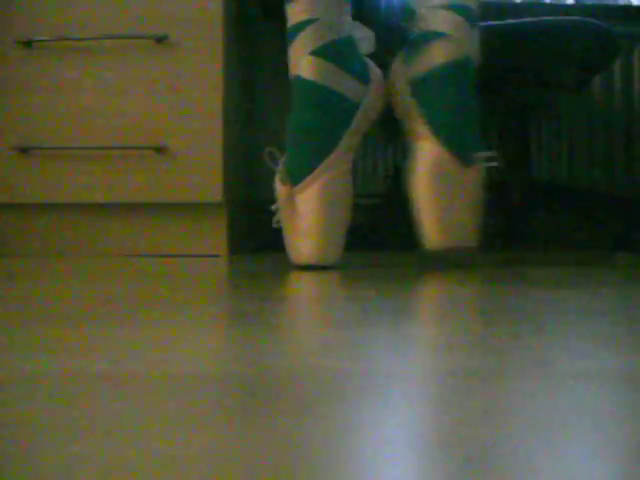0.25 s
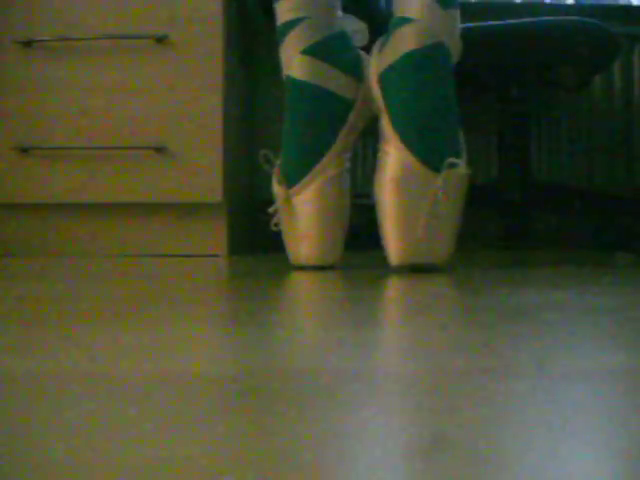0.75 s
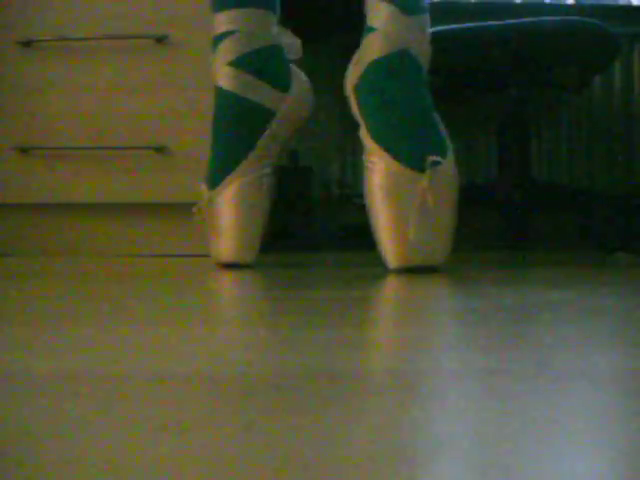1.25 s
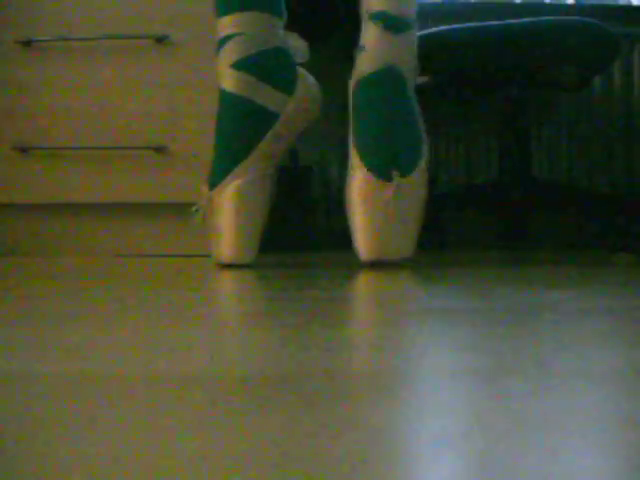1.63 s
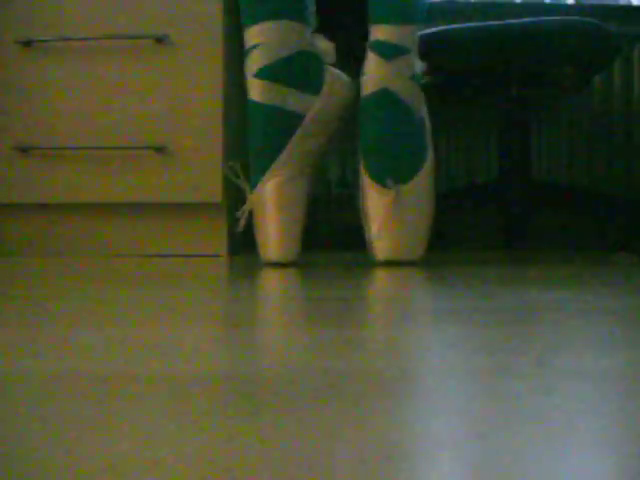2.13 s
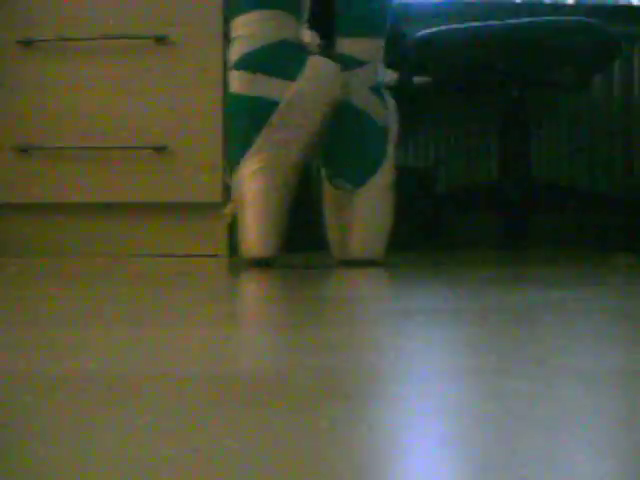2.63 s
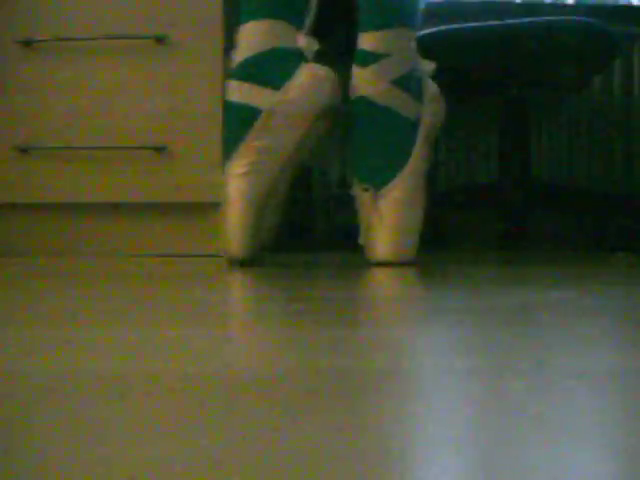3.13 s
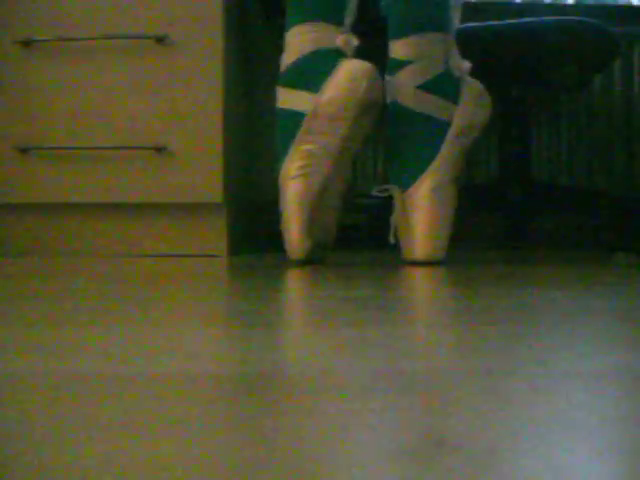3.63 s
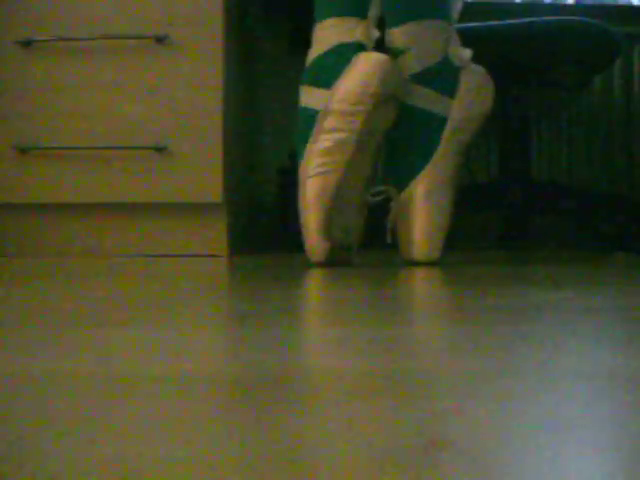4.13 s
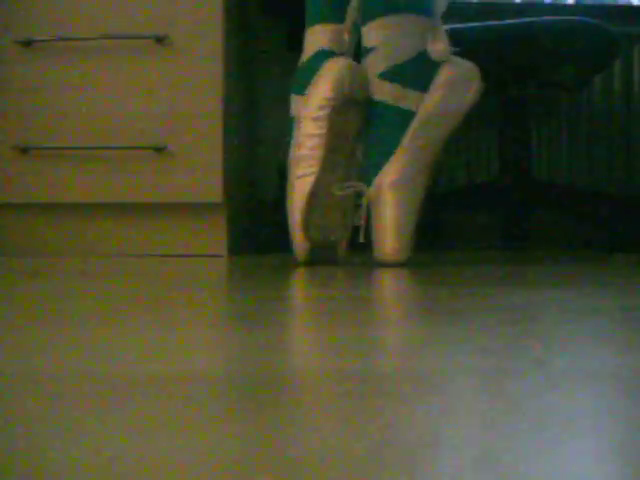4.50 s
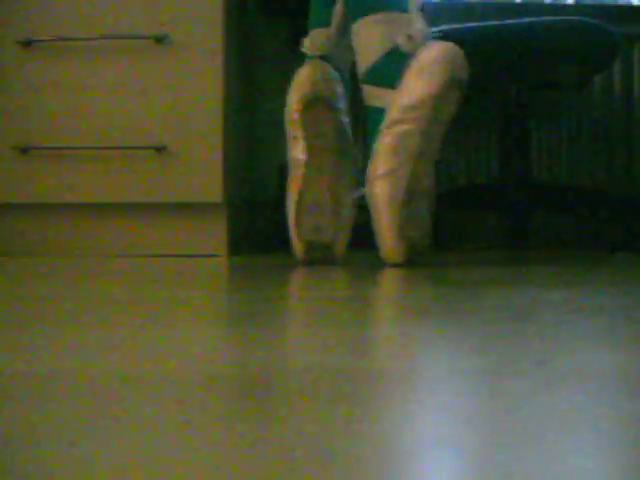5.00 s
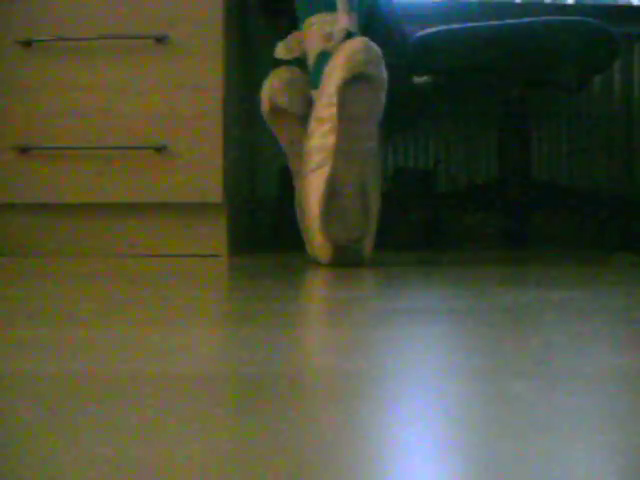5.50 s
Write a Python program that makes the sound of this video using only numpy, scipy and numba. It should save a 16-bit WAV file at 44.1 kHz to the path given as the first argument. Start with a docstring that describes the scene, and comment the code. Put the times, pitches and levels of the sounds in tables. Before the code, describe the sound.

A rough electrical buzz, pulsing about twenty-five times a second with spiky clicks over a low hum, runs from start to end with hiss, fine crackle and a very faint thin whine. A soft scuff near 0.5 s leads to a weighty, dull landing at 0.6. Stiff toe boxes then knock on the hard floor at 1.2, 1.6 and 1.9 s, with lighter taps between. Harder hollow clacks come at 2.5 and 2.7, then, after a gap, at 3.2 and 3.6. The strongest is at 4.05, followed by knocks at 4.4, 4.7 and a loud one at 4.9. A softer, thuddy step lands at 5.2; faint brushes follow to about 5.7, leaving the buzz. Each knock is a tight double contact with a low thud and short small-room ring. The close, cheap microphone sounds narrow and gritty; loud hits clip, and the background ducks then creeps back.

```python
"""Electrical buzz and hiss come first; then a dancer on pointe scuffs and knocks about on a hard floor.
Each landing sums decaying modes of toe box and floor, contact noise, a low thud and a small room's decay.
The satin tips scuff as grainy noise; the buzz repeats spikes over a hum, with hiss, ticks and a thin whine.
A cheap camera close by passes a narrow band, ducks its gain after loud sound and clips the peaks flat."""
import sys
import numpy as np
from scipy import signal
from scipy.fft import rfft, irfft, next_fast_len
from scipy.io import wavfile
from scipy.ndimage import uniform_filter1d
from numba import njit

SR = 44100
rng = np.random.default_rng(int(sys.argv[2]) if len(sys.argv) > 2 else 0)


def wrap_up_sound(samples):
    """Save the sound to the file named by the first command line argument, as 16-bit audio."""
    columns = np.atleast_2d(samples).T
    # keep every value between -1 and 1, then stretch to whole-number steps
    tamed = np.clip(columns, -1, 1)
    steps = np.round(tamed * 32767).astype(np.int16)
    wavfile.write(sys.argv[1], SR, steps)


N = 254016  # length of the scene [samples]

# Toe landings: (time [s], knock of the box [dB], thud of the weight behind it [dB])
LANDINGS = [(0.622, -8, 2.5), (1.188, -0.5, 3), (1.413, -18, -18.5), (1.624, -2.5, 0), (1.744, -13, -20),
            (1.870, 2.5, -5), (2.087, -6, -1.5), (2.194, -22.5, -24.5), (2.285, -19, 0.5), (2.51, 8, -1.5),
            (2.716, 6, -3), (3.197, 5, 0.5), (3.421, -10.5, -3.5), (3.630, 6, -3), (3.9443, -4.5, -14.5),
            (4.043, 11.5, 3.5), (4.258, -17.5, -3), (4.447, 0.5, -3), (4.711, 3.5, 3), (4.907, 11, -1.5),
            (5.18, -6.5, 3.5)]


def amp(db):
    """Level to amplitude: 20 dB is a factor of ten."""
    return 10 ** (np.asarray(db) / 20)


def unit(x):
    """Normalisation: x scaled to an rms of 1."""
    return x / np.sqrt(np.mean(x ** 2) + 1e-20)


def along(points, hz):
    """Interpolation of (frequency [Hz], value) points on a logarithmic frequency axis."""
    f, v = np.transpose(points)
    return np.interp(np.log(hz + 1), np.log(f + 1), v)


def filtered(x, response):
    """Linear filtering: the spectrum of x times a complex response of frequency."""
    m = next_fast_len(len(x) + 8192)  # zero padding leaves room for the filter's tail
    spectrum = rfft(x, m) * response(np.fft.rfftfreq(m, 1 / SR))
    return irfft(spectrum, m)[:len(x)]


def noise(spectrum, size):
    """Coloured noise: white noise shaped by a spectrum, at an rms of 1."""
    white = rng.standard_normal(size)
    return unit(filtered(white, lambda hz: amp(along(spectrum, hz))))


def add(track, s, sound):
    """Superposition: mix a sound into the track at time s [s]."""
    part = track[max(0, round(s * SR)):][:len(sound)]
    part += sound[:len(part)]


def hiss(hiss_db=-20.5, crackle_db=-28, crackle_rate=80, crackle_hz=700):
    """Random noise: a steady hiss, sparse impulses at crackle_rate per second and a faint pure tone."""
    # Colour of the hiss: (frequency [Hz], relative level [dB per Hz])
    hiss_spectrum = [(25, -17.5), (60, 3), (130, 1.5), (220, -1), (330, -2.5), (550, -3), (900, -5),
                     (1200, -10.5), (1500, -15.5), (2050, -23.5), (2550, -17.5), (3200, -24.5), (4000, -28)]
    # Thin electrical tone: (frequency [Hz], rms level [dB])
    whine_tones = [(2498, -47.5)]
    t = np.arange(N) / SR
    ticks = (rng.random(N) < crackle_rate / SR) * rng.uniform(-1, 1, N)

    def tick_band(hz):
        high_pass = 1j * hz / (160 + 1j * hz)
        return high_pass / (1 + 1j * hz / crackle_hz) ** 2

    crackle = unit(filtered(ticks, tick_band))
    whine = sum(amp(db) * np.sqrt(2) * np.sin(2 * np.pi * hz * t) for hz, db in whine_tones)
    return amp(hiss_db) * noise(hiss_spectrum, N) + amp(crackle_db) * crackle + whine


def buzz(buzz_db=0, hum_lag=0.0091, coupling_hz=69, scatter_db=1.5):
    """Periodicity: a hum at twice the cycle rate and the same few electrical spikes in every cycle."""
    # Switching spikes in each cycle: (delay [s], level [dB], polarity [+1 or -1], width [s])
    cycle_spikes = [(.0015, -2.2, -1, .00047), (.01916, -3.6, 1, .00047), (.0241, -11, 1, .00034),
                    (.03016, -8.8, -1, .00015), (.0308, -14, 1, .0005)]
    # Level of the low hum before the input capacitor: (time [s], level [dB])
    hum_level = [(0, -18.5), (3.2, -17.5), (3.6, -20), (5.76, -23.5)]
    buzz_hz = 24.586  # cycle rate
    t, period = np.arange(N) / SR, 1 / buzz_hz
    out = amp(np.interp(t, *np.transpose(hum_level))) * np.cos(2 * np.pi * 2 * buzz_hz * (t - hum_lag))
    for delay, db, polarity, width in cycle_spikes:
        cycle = np.round((t - delay) / period).astype(int)  # the nearest spike's cycle
        sizes = amp(db + scatter_db * rng.standard_normal(cycle.max() + 2))
        from_spike = t - delay - cycle * period
        out += polarity * sizes[cycle] * np.exp(-(from_spike / width) ** 2 / 2)
    # the input capacitor makes each spike swing back through zero
    return amp(buzz_db) * filtered(out, lambda hz: 1j * hz / (coupling_hz + 1j * hz))


def drags(pause_s=.4, lead_s=.18, drag_db=-32.5, drag_s=0.12):
    """Sliding friction after standing still: the foot drags before the next landing, as scuff rows."""
    times = [s for s, _, _ in LANDINGS]
    return [(s - lead_s, drag_db, drag_s) for before, s in zip(times, times[1:]) if s - before > pause_s]


def scuffs(grain_db=2.0):
    """Stick-slip friction: satin catches and slips in a grainy rub that swells fast and fades."""
    # Tips brushing the floor: (time [s], level [dB], length [s])
    brushes = [(0.472, -24, 0.14), (1.366, -13, 0.02), (3.760, -13.5, 0.0063), (3.942, -16, .04),
               (4.507, -20.5, 0.041), (5.315, -22, 0.04), (5.669, -17.5, .06)]
    # Colour of the rub: (frequency [Hz], relative level [dB per Hz])
    satin_spectrum = [(100, -18.5), (400, 12), (800, 4.5), (1300, 3), (1900, -2.5), (2700, 1), (3400, -4.5),
                      (4200, -8.5)]
    out, t = np.zeros(N), np.arange(SR // 2) / SR
    for s, db, length in brushes + drags():
        u = 3 * t / length  # the swell peaks at a third of the length
        swell = u * np.exp(1 - u)
        flutter = unit(uniform_filter1d(rng.standard_normal(len(t)), size=120))
        rub = unit(amp(grain_db * flutter) * noise(satin_spectrum, len(t)))
        add(out, s, amp(db) * swell * rub)
    return out


def ring(modes, t, scatter_db=2, detune=0.0082):
    """Modal synthesis: struck modes start together, each with scattered strength and pitch."""
    out = np.zeros(len(t))
    for hz, db, t60 in modes:
        # the place of contact sets how strongly each mode rings
        decay = amp(db + rng.normal(0, scatter_db) - 60 * t / t60)
        out += decay * np.sin(2 * np.pi * hz * (1 + rng.normal(0, detune)) * t)
    return out


def reverberant(spectrum, size):
    """Reverberation: dense reflections as noise, each frequency dying at the room's own rate."""
    # Decay of the room: (frequency [Hz], t60 [s])
    room_decay = [(100, 0.61), (300, 0.44), (700, 0.4), (1300, 0.43), (3500, 0.067)]
    hz, t, z = signal.stft(noise(spectrum, size), SR, nperseg=512)
    fading = z * amp(-60 * t / along(room_decay, hz)[:, None])
    return signal.istft(fading, SR, nperseg=512)[1][:size]


def thud(t, room_db=-11.0, push_db=-7, push_t60=0.15, press_db=-3.0, press_hz=190, press_t60=0.026):
    """Low-frequency excitation: body weight presses the floor in a short swing and wakes its low modes."""
    # Slow flexing of the floor under the weight: (frequency [Hz], level [dB], t60 [s])
    flex_modes = [(110.8, -23, 0.79), (158.1, -4, 0.32), (208.4, -21, 0.26), (255, -2, 0.094),
                  (324.8, -1.5, 0.068)]
    # Colour of the push: (frequency [Hz], relative level [dB per Hz])
    thud_spectrum = [(30, -8.5), (100, -12.5), (150, -3), (210, -10.5), (300, -3), (450, -13), (800, -26.5),
                     (2000, -49.5)]
    press = np.sin(2 * np.pi * press_hz * t) * amp(press_db - 60 * t / press_t60)
    push = noise(thud_spectrum, len(t)) * amp(push_db - 60 * t / push_t60)
    room = amp(room_db) * reverberant(thud_spectrum, len(t))
    onset = 1 - np.exp(-t / 0.00083)
    return (press + ring(flex_modes, t) + push + room) * onset


def hardness_hz(knock_db, thud_db):
    """Contact stiffness: the treble edge rises with the thud and falls slightly with the knock level."""
    edge_hz, knock_oct_per_db, thud_oct_per_db = 1160, -0.01, 0.09  # edge at 0 dB and its shifts
    return edge_hz * 2 ** (knock_oct_per_db * knock_db + thud_oct_per_db * thud_db)


def knock(t, hard_hz, toe_db=1.5, floor_db=-13.0, room_db=-6, clack_db=-5.0, clack_t60=0.063,
          crack_db=5.5, crack_t60=0.009):
    """Impact: the stiff toe box cracks, clacks and rings the floor; a softer contact loses treble."""
    # Modes of the glued toe box: (frequency [Hz], relative level [dB], t60 [s])
    toe_modes = [(689, 0.5, 0.045), (980, -11, 0.017), (1850, -1, 0.01), (3000, -7, .015)]
    # Ring of the floor and the room over it: (frequency [Hz], relative level [dB], t60 [s])
    floor_modes = [(279.3, -3, 0.47), (404.6, -2, 0.29), (463.3, -2, 0.67), (522, -8, 0.51),
                   (585.5, 1, 0.21), (656.5, -6.5, 0.4), (700.5, 1.5, 0.21), (764, -1.5, 0.24),
                   (805, -0.5, 0.24), (902, -14.5, 1), (1181, -14.5, 0.6), (1430, -17.5, 0.11),
                   (1680, -8, 0.11), (1730, -13.5, 0.12), (2100, -14.5, 0.06)]
    # Colour of the contact noise: (frequency [Hz], relative level [dB per Hz])
    box_spectrum = [(60, -18.5), (200, 1), (400, 6), (720, 8), (900, 4), (1200, -23), (2000, -15.5),
                    (3000, -25), (4000, -23)]
    toe = amp(toe_db) * ring(toe_modes, t, detune=.03)
    floor = amp(floor_db) * ring(floor_modes, t, detune=0.0027)
    contact = amp(crack_db - 60 * t / crack_t60) + amp(clack_db - 60 * t / clack_t60)
    room = amp(room_db) * reverberant(box_spectrum, len(t))
    blow = toe + floor + contact * noise(box_spectrum, len(t)) + room
    # second-order low-pass at the treble edge of the contact
    return filtered(blow, lambda hz: 1 / (1 + 1j * np.sqrt(2) * hz / hard_hz - (hz / hard_hz) ** 2))


def steps(settle_s=.012, settle_db=-9):
    """Double impact: the box meets the floor edge first, then settles flat with a weaker second knock."""
    out, t = np.zeros(N), np.arange(SR // 2) / SR
    for s, knock_db, thud_db in LANDINGS:
        hard_hz = hardness_hz(knock_db, thud_db)
        add(out, s, amp(knock_db) * knock(t, hard_hz) + amp(thud_db) * thud(t))
        add(out, s + settle_s, amp(knock_db + settle_db) * knock(t, hard_hz))
    return out


def scene():
    """Superposition: electrical noise and shoes add in one channel."""
    return (hiss() + buzz() + scuffs() + steps())[None]


@njit
def gain_control(x, threshold, follow_step, attack_step, release_step):
    """Feedback: gain in dB falls while the smoothed output exceeds the threshold, else creeps back to 0."""
    out, db, level = np.empty_like(x), 0., 0.
    for i in range(len(x)):
        out[i] = x[i] * 10 ** (db / 20)
        level += follow_step * (min(abs(out[i]), 1.) - level)
        if level > threshold:
            db = db - attack_step * (level - threshold)
        else:
            db = min(0., db + release_step)
    return out


def record(dry, threshold=0.17, follow_s=0.027, attack_db_per_s=310, release_db_per_s=24, ceiling=0.82):
    """Nonlinear distortion: after a voice-band input and gain control, hard clipping adds new treble."""
    # The camera's input filter: (frequency [Hz], gain [dB])
    voice_band = [(3300, 2), (3700, -2), (4000, -4), (4300, -12.5), (4550, -34), (4800, -68.5)]
    # Its output colour: (frequency [Hz], gain [dB])
    output_colour = [(3700, -1), (4500, -9.5), (5500, -10), (6800, -7.5), (7350, -3), (7900, -7.5),
                     (8700, -8), (12000, -10), (14700, -16), (15300, -4), (16000, -12)]
    top_hz = 16000  # nothing passes from here up
    narrow = filtered(dry[0], lambda hz: amp(along(voice_band, hz)))
    # attack_db_per_s is the fall per unit of level above the threshold
    ducked = gain_control(narrow, threshold, 1 / (follow_s * SR), attack_db_per_s / SR, release_db_per_s / SR)
    clipped = np.clip(ducked, -ceiling, ceiling)
    return filtered(clipped, lambda hz: amp(along(output_colour, hz)) * (hz < top_hz))[None]


dry = scene()
out = record(dry)
wrap_up_sound(out)
```